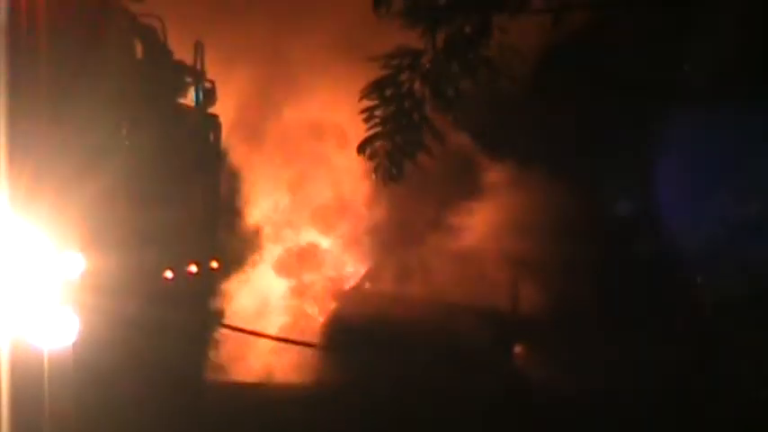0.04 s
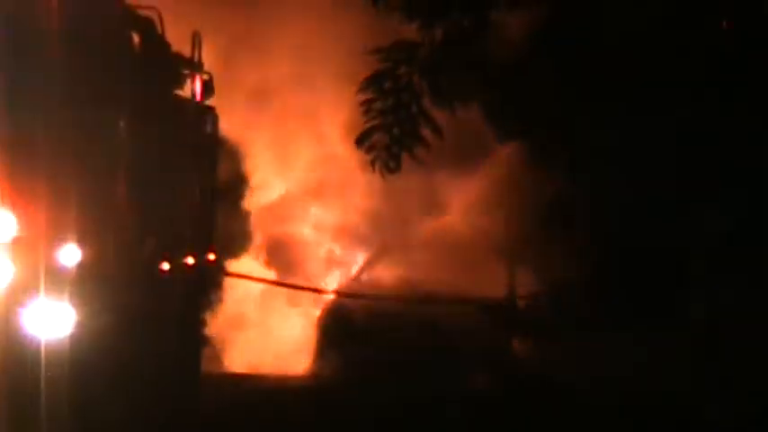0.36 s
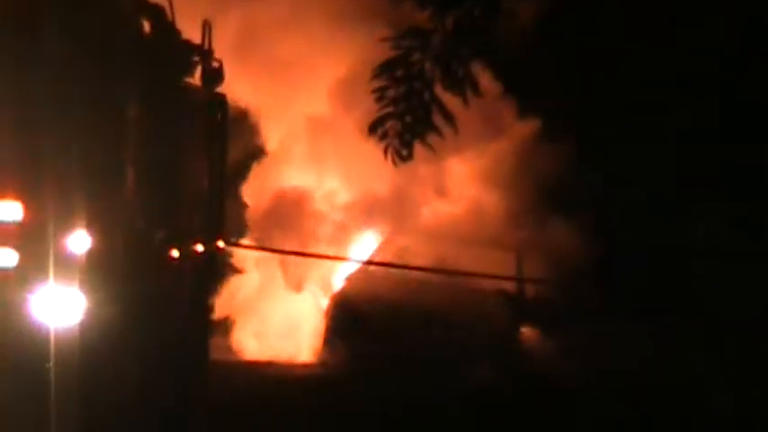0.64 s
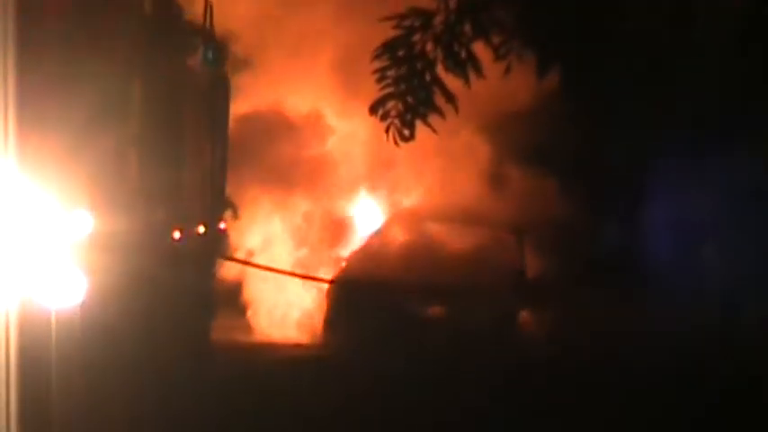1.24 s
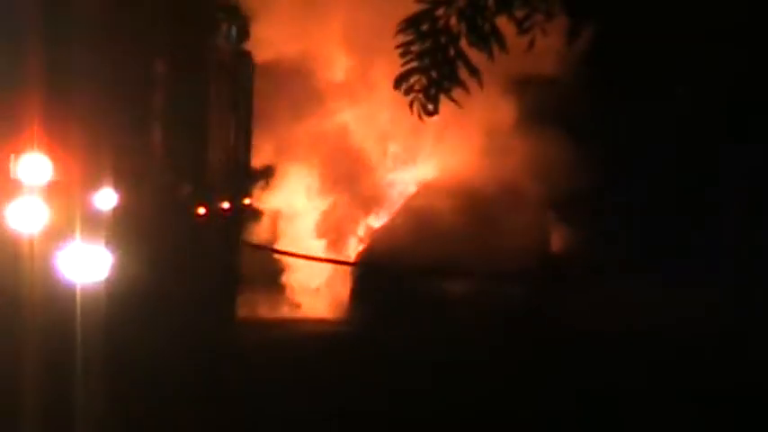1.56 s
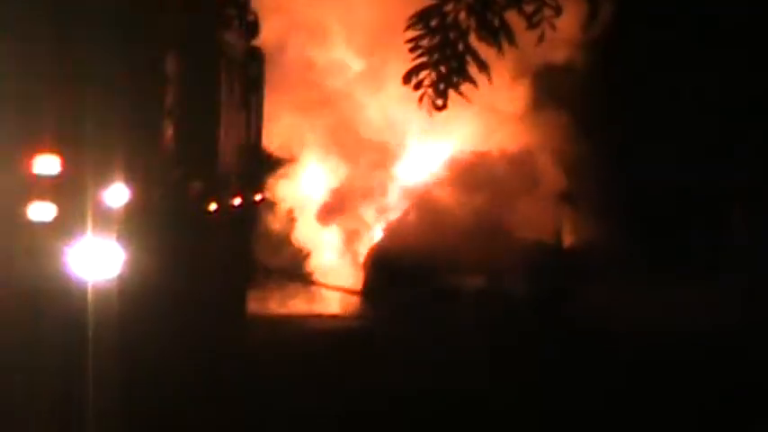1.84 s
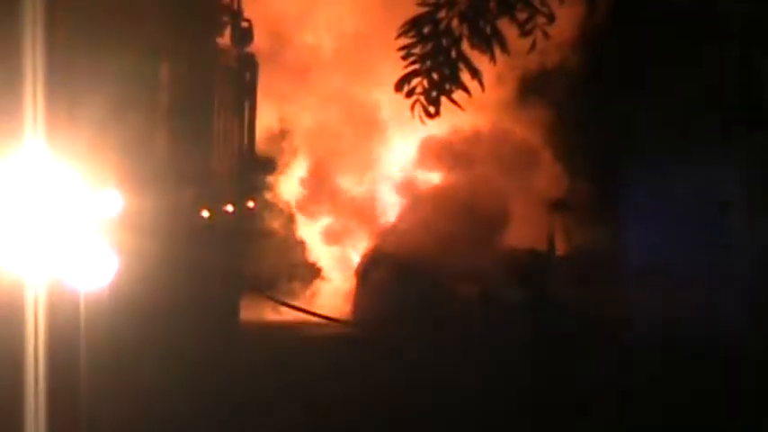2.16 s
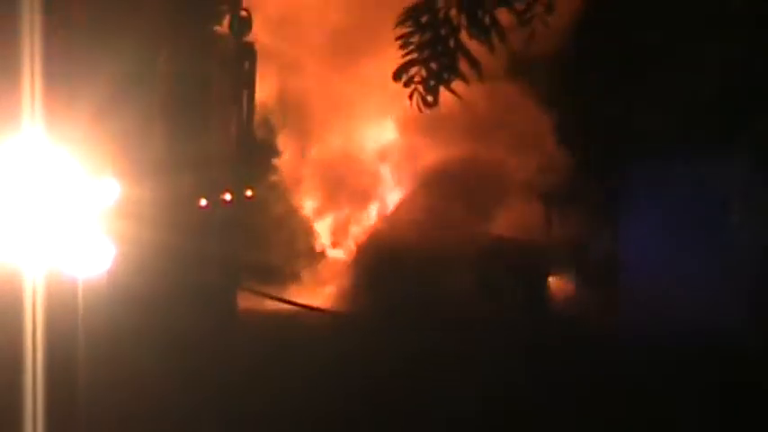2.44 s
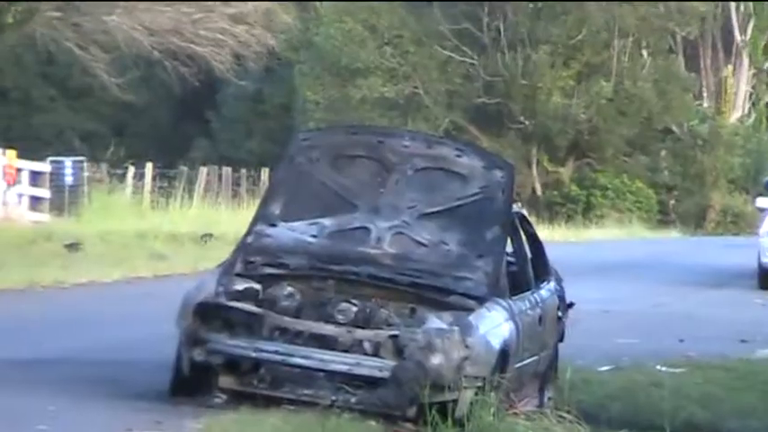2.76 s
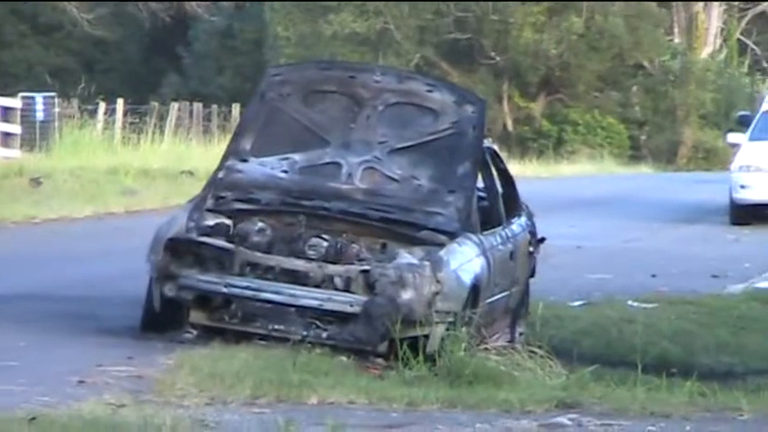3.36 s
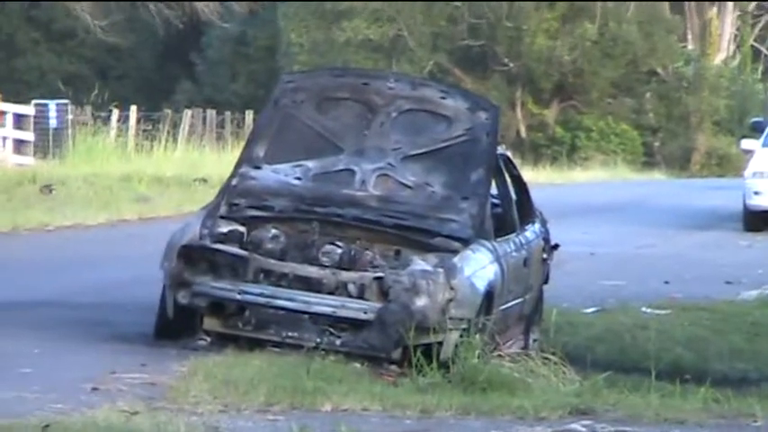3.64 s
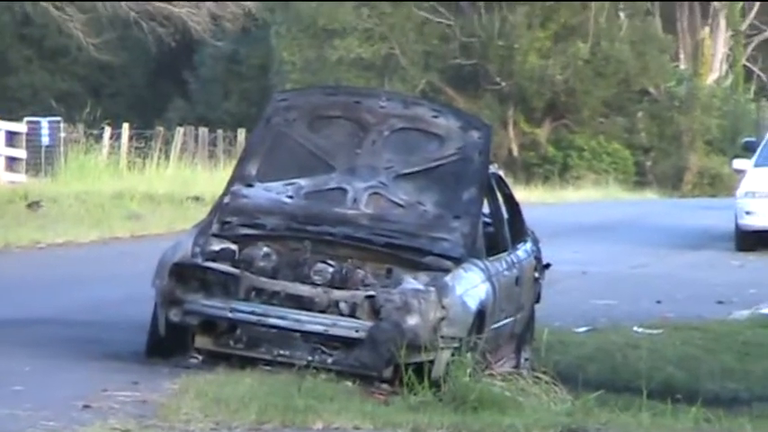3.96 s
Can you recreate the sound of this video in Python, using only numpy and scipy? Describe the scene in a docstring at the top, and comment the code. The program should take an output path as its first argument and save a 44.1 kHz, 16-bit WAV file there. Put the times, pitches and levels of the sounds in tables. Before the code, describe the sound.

A burning car roars over a diesel fire truck's idle, before a quiet roadside with birdsong.

```python
"""A diesel fire truck idles close by at night, its firings knocking over a booming exhaust and thin
gear whines. Behind it a car burns: flames roar and crackle, steam hisses in surges, one jet whistles.
The scene cuts to a quiet roadside by day, where a far engine hums, leaves rustle and small birds chirp.
One bird slurs a few quick notes into a rising whistle that rings in the trees."""
import sys
import numpy as np
from scipy import signal
from scipy.fft import rfft, irfft, next_fast_len
from scipy.io import wavfile
from scipy.ndimage import map_coordinates

SR = 44100
rng = np.random.default_rng(int(sys.argv[2]) if len(sys.argv) > 2 else 0)


def generate_wav(signal):
    """Clip the signal to [-1, 1] and save it as 16-bit WAV at the path in sys.argv[1]."""
    frames = np.transpose(np.atleast_2d(signal))
    scaled = np.clip(frames, -1, 1) * 32767
    pcm = np.round(scaled).astype(np.int16)
    wavfile.write(sys.argv[1], SR, pcm)


N = 176400
T = np.arange(N) / SR
CUT_S, CUT_FADE_S = 2.619, 0.0025  # night gives way to day
SHAFT_HZ, FAR_ENGINE_HZ = 16.027, 68

# Colour of the daytime air bed: f/Hz, relative level/dB
AIR_COLOUR = [(20, -14), (40, -15), (58, -11), (105, 1), (150, -3), (230, -4), (420, -7.5), (700, -10),
              (1040, -5), (1300, -8), (1600, -11.5), (2400, -18), (4200, -20), (7000, -27.5), (12800, -33),
              (14000, -48)]
# Stereo image of air and leaves: f/Hz, left-right correlation
DAY_IMAGE = [(70, .95), (130, 0.54), (300, 0), (1000, .35), (2500, 0), (10000, 0)]
# Fader ride on the far engine: t/s, level/dB
FAR_ENGINE_RIDE = [(2.65, -52.5), (3.1, -55.5), (3.4, -51.5), (3.6, -50), (3.78, -53), (4.0, -51)]
# Stirs of the leaves: start t/s, length/s, level/dB
LEAF_CUES = [(2.925, 0.14, -63), (2.94, .04, -57), (3.92, .1, -64)]
# Colour of the leaves: f/Hz, relative level/dB
LEAF_COLOUR = [(1200, -25), (2400, 3.5), (4000, -2), (5500, 3), (8000, -15), (12000, -26)]
# Far birds' notes: start t/s, length/s, first f/Hz, last f/Hz, level/dB before the mix
FAR_CHIRPS = [(2.842, 0.018, 3650, 3580, -57.5), (2.912, .025, 4350, 4000, -63),
              (2.918, .025, 7200, 6660, -69), (2.94, 0.022, 5700, 5600, -61),
              (2.962, .035, 5150, 5670, -66), (3.845, 0.011, 1950, 1880, -60),
              (3.925, 0.069, 2300, 2400, -65), (3.962, .025, 2820, 2760, -63)]
# Near bird's opening notes: start t/s, length/s, first f/Hz, last f/Hz, level/dB before EQ and mix
OPENING_SLURS = [(3.177, 0.023, 1380, 1484, -53), (3.184, .038, 2430, 4070, -54),
                 (3.196, .022, 2480, 2610, -48), (3.213, 0.0105, 2600, 1970, -47.5),
                 (3.221, 0.022, 2820, 2887, -43), (3.252, 0.05, 3950, 3947, -44.5),
                 (3.272, 0.0201, 2800, 3330, -43), (3.288, 0.018, 3700, 4650, -49.5),
                 (3.294, 0.018, 4550, 4530, -51.5)]
# Its long whistle: t/s, f/Hz, level/dB before EQ and mix
WHISTLE_PATH = [(3.305, 3250, -80), (3.313, 3138, -45), (3.33, 3080, -44), (3.36, 3170, -43),
                (3.39, 3230, -46), (3.415, 3357, -45.5), (3.44, 3596, -48.5), (3.475, 3650, -46.5),
                (3.492, 3650, -84)]
# Tone shaping by its beak: f/Hz, gain/dB
BEAK_EQ = [(3000, -1), (6300, 2), (7200, -3), (8000, -12), (11000, 4), (13000, -12)]
# Colour of the flames: f/Hz, relative level/dB
FLAME_COLOUR = [(20, -18), (60, -22), (120, -0.5), (230, 9), (400, -0.5), (600, 2.5), (1200, -4.5),
                (2000, -4.5), (3200, -10), (6500, -12.5), (9000, -17), (12500, -22), (15000, -38)]
# Stereo image of flames and steam: f/Hz, left-right correlation
FIRE_IMAGE = [(100, .99), (500, 0.94), (1200, 0.97), (2500, 0.73), (8000, 0.74), (13000, 0.75)]
# Colour of steam and crackle: f/Hz, relative level/dB
HISS_COLOUR = [(700, -20), (2000, -4), (3500, -1.5), (5200, -1.5), (6200, 1), (7100, -2), (8300, 1.5),
               (10000, -4), (12500, -6), (15000, -21)]
# Surges of steam: start t/s, length/s, level/dB
STEAM_CUES = [(.235, 0.029, -42), (.30, 0.025, -45), (.67, .10, -42.5), (.755, 0.017, -40),
              (1.36, 0.057, -38), (1.42, .44, -41.5), (1.56, 0.17, -41), (1.592, 0.077, -32.5),
              (2.205, .025, -42.5), (2.37, 0.12, -42)]
# The whistling steam jet: start t/s, length/s, level/dB
JET_CUE = (1.6, .045, -34)
# Resonances of that jet: f/Hz, width/Hz, relative level/dB
JET_RESONANCES = [(3200, 290, -10), (3600, 130, -11), (4730, 390, -3), (6060, 130, -2), (6700, 150, -9)]
# Tones of the truck's gears and pump: f/Hz, level/dB
GEAR_TONES = [(592.5, -53.5), (769.5, -52), (801.5, -54.5), (1009, -52.5), (1249, -53), (1394, -55),
              (6234, -65)]
# Tones of its exhaust: multiple of the shaft speed, relative level/dB
EXHAUST_TONES = [(2, -30), (3, -7.5), (4, -23), (5, -30), (6, -6), (7, -17), (8, -12), (9, 0), (10, -18),
                 (11, -19), (12, -17), (13, -18), (14, -15.5), (15, -12), (16, -20), (18, -23)]
# Colour of its diesel knock: f/Hz, relative level/dB
KNOCK_COLOUR = [(110, -50), (170, -8), (230, 6), (290, 1), (410, -6.5), (580, 0), (680, -8), (790, -5),
                (890, -8), (1300, -4), (2000, -11), (3000, -15), (6000, -26.5), (12000, -56)]


def amp(db):
    """Decibels to gain."""
    return 10 ** (np.asarray(db) / 20)


def unit(x):
    """Scale to rms 1."""
    return x / np.sqrt(np.mean(x ** 2) + 1e-20)


def along(points, hz):
    """Read a curve of (f/Hz, value) points on a log frequency axis."""
    f, v = np.transpose(points)
    return np.interp(np.log(hz + 1), np.log(f + 1), v)


def wobble(rate):
    """Smooth random modulation, rate knots a second."""
    return map_coordinates(rng.standard_normal(int(N * rate / SR) + 4), [T * rate])


def filtered(x, response):
    """Shape x with a gain given as a function of frequency."""
    m = next_fast_len(N + SR // 2)
    return irfft(rfft(x, m) * response(np.fft.rfftfreq(m, 1 / SR)), m)[..., :N]


def eq(x, curve):
    """Shape x with a curve of (f/Hz, gain/dB) points."""
    return filtered(x, lambda hz: amp(along(curve, hz)))


def rush(colour, image):
    """Coloured stereo noise of rms 1, its width set band by band."""
    def mid_side_gains(hz):
        width = np.arccos(np.clip(along(image, hz), -1, 1)) / 2
        return amp(along(colour, hz)) * [np.cos(width), np.sin(width)]
    mid, side = filtered(rng.standard_normal((2, N)), mid_side_gains)
    return unit(np.array([mid + side, mid - side]))


def pan(left_db):
    """Channel gains for a source that is louder on the left by left_db."""
    return amp(np.array([[.5], [-.5]]) * left_db)


def swell(start, length, attack_s, release_s):
    """Attack, hold and exponential release."""
    rise = np.clip((T - start) / attack_s + .5, 0, 1)
    return rise * np.exp(-np.maximum(T - start - length, 0) / release_s)


def swells(cues, attack_s, release_s):
    """Overlapping swells summed in power."""
    return np.sqrt(sum((amp(db) * swell(s, length, attack_s, release_s)) ** 2 for s, length, db in cues))


def roadside():
    """The daytime bed: a far engine's wavering hum, still air and faint stirs of leaves."""
    hum_level = amp(np.interp(T, *np.transpose(FAR_ENGINE_RIDE)) + 1.2 * wobble(10))
    hum = np.sqrt(2) * hum_level * np.sin(2 * np.pi * FAR_ENGINE_HZ * T + 0.28 * wobble(8))
    air = amp(-52) * rush(AIR_COLOUR, DAY_IMAGE)
    stirs = swells(LEAF_CUES, attack_s=.02, release_s=0.022) * amp(2.5 * wobble(90))
    leaves = stirs * rush(LEAF_COLOUR, DAY_IMAGE)
    return hum * pan(left_db=4) + air * pan(left_db=0.5) + leaves


def tree_reverb(x):
    """A diffuse tail from the wood; the highs die sooner."""
    hz, t, noise = signal.stft(rng.standard_normal((2, SR)), SR, nperseg=256)
    t60_s = along([(3500, 1.023), (7000, 0.891)], hz)
    tail = signal.istft(noise * amp(-60 * t / t60_s[:, None]), SR, nperseg=256)[1]
    predelayed = np.pad(x, (400, 0))
    return signal.fftconvolve(predelayed[None], tail / np.linalg.norm(tail[0]), axes=1)[:, :N]


def early_reflections(x, t60_s=0.11):
    """Dense scatter from the road and the nearest branches blurs each note."""
    t = np.arange(SR // 6) / SR
    scatter = rng.standard_normal((2, len(t))) * amp(-60 * t / t60_s) * (t > .002)
    return signal.fftconvolve(x[None], scatter / np.linalg.norm(scatter[0]), axes=1)[:, :N]


def bird_voice(hz, level, quaver=0.00606, roughness_rad=0.44):
    """A quavering whistle with a raspy edge and two rough overtones."""
    phase = 2 * np.pi * np.cumsum(hz * (1 + quaver * wobble(400))) / SR
    overtones = sum(amp(db) * np.sin(k * (phase + roughness_rad * wobble(700)))
                    for k, db in [(2, -17), (3, -33)])
    rasp = amp(-12.5) * wobble(1100) * np.cos(phase)
    return np.sqrt(2) * level * amp(1.5 * wobble(120)) * (np.sin(phase) + rasp + overtones)


def slurs(notes):
    """Short bird notes that glide from one pitch to another."""
    phrase = np.zeros(N)
    for start, length, first_hz, last_hz, db in notes:
        glide = np.interp(T, [start, start + length], [first_hz, last_hz])
        phrase += bird_voice(glide, amp(db) * swell(start, length, attack_s=.005, release_s=0.0027))
    return phrase


def birds():
    """Quick slurs run into a long rising whistle; other birds chirp farther off, wetter in the mix."""
    times, hz, db = np.transpose(WHISTLE_PATH)
    whistle_level = amp(np.interp(T, times, db)) * (T > times[0]) * (T < times[-1])
    call = eq(slurs(OPENING_SLURS) + bird_voice(np.interp(T, times, hz), whistle_level), BEAK_EQ)
    far = slurs(FAR_CHIRPS)
    direct = (amp(-1) * call + amp(-3.5) * far) * pan(left_db=2.5)
    send = call + far
    return direct + amp(-4.5) * early_reflections(send) + amp(-1.5) * tree_reverb(send)


def crackle(pops_per_s=700, t60_s=0.0068):
    """Tiny pops of uneven size, scattered across the stereo field."""
    when, chance, position = rng.random((int(pops_per_s * N / SR), 3)).T
    size = amp(-4 * np.log(chance * .95 + .05))  # many small, a few large
    onsets = (when * (N - 1)).astype(int)
    trains = np.array([np.bincount(onsets, size * (1 + side * (position - .5)), N) for side in (-1, 1)])
    t = np.arange(SR // 200) / SR
    snap = rng.standard_normal(len(t)) * amp(-60 * t / t60_s)
    return unit(eq(signal.fftconvolve(trains, snap[None])[:, :N], HISS_COLOUR))


def car_fire():
    """Flames roar and crackle; steam hisses and spatters in surges."""
    roar = amp(-34.5 + 0.28 * wobble(14)) * rush(FLAME_COLOUR, FIRE_IMAGE)
    # The body of the roar leans left, its top end right.
    roar = filtered(roar, lambda hz: pan(along([(400, 2), (2500, 2.4), (5500, -1.1), (12000, -1)], hz)))
    surges = swells(STEAM_CUES, attack_s=0.012, release_s=.014) * amp(.7 * wobble(70))
    steam = surges * (rush(HISS_COLOUR, FIRE_IMAGE) + amp(-7) * crackle())
    return roar + steam * pan(left_db=-1) + amp(-53) * crackle()


def steam_jet():
    """A brief blast of steam whistles through a gap, dead centre."""
    def gap(hz):
        return sum(amp(db) * 1j * hz * width / (centre ** 2 - hz ** 2 + 1j * hz * width)
                   for centre, width, db in JET_RESONANCES)
    whistle = unit(filtered(rush(HISS_COLOUR, FIRE_IMAGE), gap))
    start, length, level_db = JET_CUE
    return amp(level_db) * swell(start, length, attack_s=0.013, release_s=.015) * whistle


def gear_whine(turns):
    """Thin, wavering tones of gears and pump follow the shaft speed."""
    return sum(amp(db + 2.2 * wobble(7)) * np.sin(2 * np.pi * hz * turns / SHAFT_HZ + .45 * wobble(12))
               for hz, db in GEAR_TONES)


def diesel_clatter(turns, t60_s=0.16, jitter_s=.00005, spread_db=0.5):
    """Three firings a turn, each with its own knock, slightly uneven in timing and weight."""
    clatter, t = np.zeros(N), np.arange(SR // 8) / SR
    for offset in np.arange(3) / 3:
        firings = np.interp(np.arange(int(turns[-1])) + offset, turns, T)
        timing, weight = rng.standard_normal((len(firings), 2)).T
        onsets = np.clip((firings + jitter_s * timing) * SR, 0, N - 1).astype(int)
        knock = rng.standard_normal(len(t)) * amp(-60 * t / t60_s)
        clatter += signal.fftconvolve(np.bincount(onsets, amp(spread_db * weight), N), knock)[:N]
    return unit(eq(clatter, KNOCK_COLOUR))


def exhaust(turns, first_boom_s=.0138, boom_above_hz=170):
    """The low tones of the exhaust hum on smoothly; the upper ones gather into one boom a turn."""
    boom_flutter = amp(1.5 * wobble(23))
    drone = np.zeros(N)
    for k, db in EXHAUST_TONES:
        in_boom = k * SHAFT_HZ > boom_above_hz
        phase = rng.uniform(-np.pi, np.pi) * (.2 if in_boom else 1)  # near-aligned tones form a pulse
        tone = np.cos(2 * np.pi * k * (turns - first_boom_s * SHAFT_HZ) + phase)
        drone += amp(db + 0.74 * wobble(8.96)) * (boom_flutter if in_boom else 1) * tone
    return drone


def truck(speed_drift=.0008):
    """One idling shaft drives knock, whine and exhaust, close up and left of centre."""
    turns = np.cumsum(SHAFT_HZ * (1 + speed_drift * wobble(6))) / SR
    clatter = amp(-37.5) * diesel_clatter(turns)
    tones = np.sqrt(2) * (gear_whine(turns) + amp(-25.5) * exhaust(turns))
    return tones * pan(left_db=3.5) + clatter * pan(left_db=3)


def scene():
    """A hard cut from the night fire to the daytime roadside."""
    day = np.clip((T - CUT_S) / CUT_FADE_S + .5, 0, 1)
    return (1 - day) * (truck() + car_fire() + steam_jet()) + day * (roadside() + birds())


def record(dry, top_hz=14900):
    """A brick-wall high cut on the whole mix."""
    return filtered(dry, lambda hz: hz < top_hz)


dry = scene()
out = record(dry)
generate_wav(out)
```